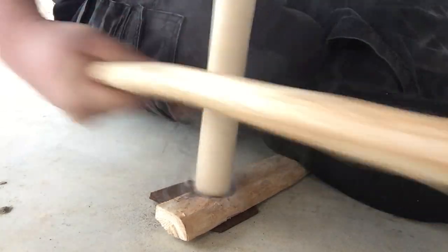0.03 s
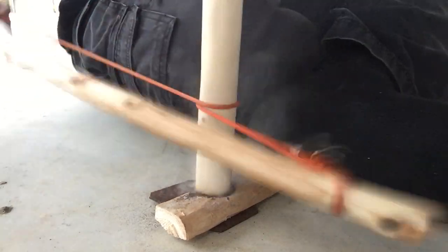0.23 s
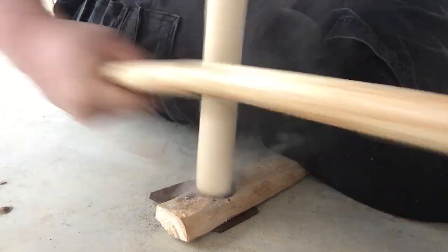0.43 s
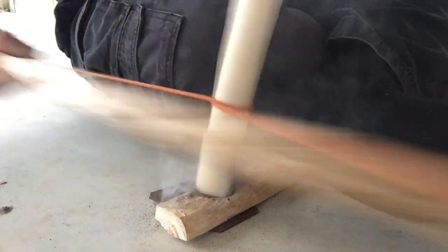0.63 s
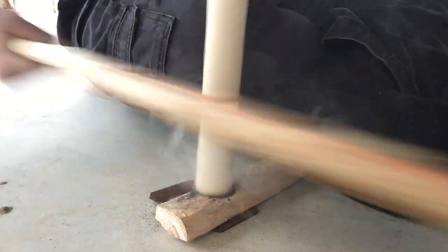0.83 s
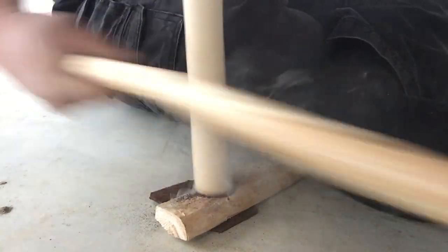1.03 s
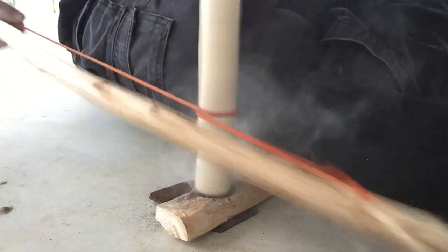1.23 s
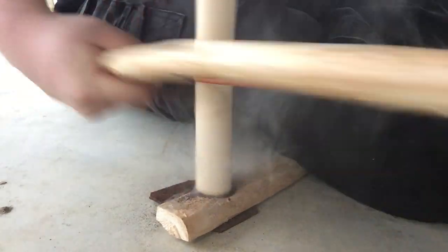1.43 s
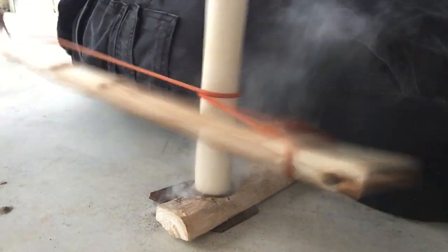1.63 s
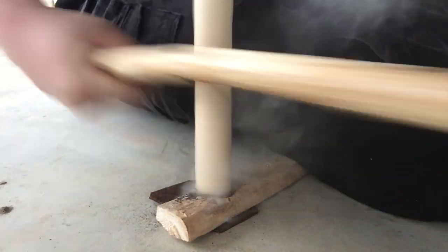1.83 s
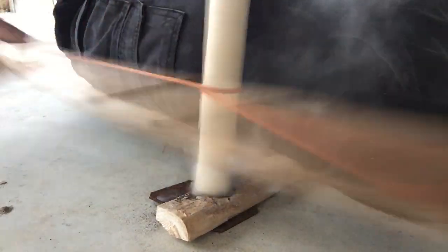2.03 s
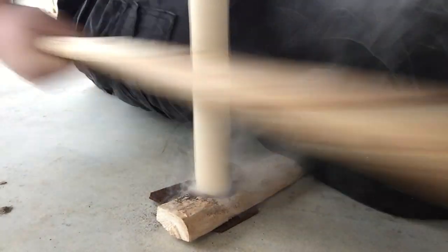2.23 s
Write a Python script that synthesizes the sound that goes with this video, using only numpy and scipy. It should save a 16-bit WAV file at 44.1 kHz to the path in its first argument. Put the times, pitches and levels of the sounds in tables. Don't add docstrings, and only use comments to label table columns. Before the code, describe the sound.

Bow drill rasping quickly back and forth on wood, with brief dry squeaks and ticking turns

```python
import sys
import numpy as np
from scipy import signal
from scipy.fft import rfft, irfft, next_fast_len
from scipy.io import wavfile
from scipy.ndimage import uniform_filter1d, map_coordinates

SR = 44100
rng = np.random.default_rng(int(sys.argv[2]) if len(sys.argv) > 2 else 0)


def transcribe(u):
    v = np.clip(np.atleast_2d(u).T, -1, 1)
    q = np.round(v * 32767).astype(np.int16)
    wavfile.write(sys.argv[1], SR, q)


def volts_from_decibels(level):
    exponent = np.asarray(level, float) / 20
    return 10 ** exponent


N = 101429
TOP_HZ = 15850

# frequency in Hz, density in dB per Hz.
RUMBLE_SPECTRUM = [(24, -8), (40, 0), (70, 4.5), (140, -6), (237, 0), (477, -8.5), (1000, -3.5),
                   (1300, -11.5), (2200, -120)]
# start in seconds, end in seconds, then rasp, low mode and high mode levels in dB.
STROKES = [(-.1, 0.121, -51.5, -62, -44.5), (0.128, 0.366, -51.5, -50, -52),
           (0.384, 0.607, -51, -61.5, -48.5), (0.622, 0.852, -50, -65, -52.5),
           (0.86, 1.118, -51, -55.5, -49.5), (1.108, 1.323, -54, -67, -65), (1.342, 1.559, -49.5, -54, -49),
           (1.536, 1.782, -53.5, -55.5, -52.5), (1.773, 2.025, -52.5, -51.5, -56.5),
           (2.01, 2.256, -52.5, -55.5, -59.5), (2.24, 2.444, -53, -57, -48.5)]
NOTCH_DB = [-64.5, -59, -64.5, -62, -62, -65.5, -64, -61, -65.5, -66, -55.5]
# frequency in Hz, density in dB per Hz.
RASP_SPECTRUM = [(290, -9), (500, -11), (687, -17), (1450, -1.5), (2110, -6.5), (2660, -1.5), (3400, -6.5),
                 (7860, -9.5), (15700, -7.5)]
# frequency in Hz, width in Hz, level in dB.
BOARD_MODES = [(7800, 710, 6.5), (9310, 980, 4.5), (11470, 600, 1)]
# time in seconds, peak in dB, ring length share, pitch share.
TICKS = [
    (0.0034, -35, 0.84, .78),
    (0.3908, -38, 0.67, 0.92),
    (0.623, -34.5, 1.16, 1.03),
    (1.085, -45, 1.3, 0.975),
    (1.1078, -36.5, 1.02, 1.002),
    (1.3374, -36.5, 0.86, .98),
    (1.7961, -30, 0.56, 0.98),
    (1.9985, -49, 0.72, 0.96),
    (2.0186, -30.5, 1.05, 0.98),
    (2.249, -31.5, 0.7, 0.99),
]
# frequency in Hz, level in dB, 60 dB decay in seconds.
SOCKET_MODES = [(2006, 3.5, 0.016), (1553, -2.5, 0.017), (2740, -35, 0.011)]
# centre in seconds, pitch in Hz, level in dB,
# half width in ms, glide in Hz per ms.
LOW_SWELLS = [(.184, 1334, -51.5, 11, -3), (.198, 1250, -49.5, 7.6, -2), (.212, 1257, -47, 10, 0.5),
              (.243, 1208, -33.5, 8.5, -2), (.2575, 1198, -20, 7.87, -7.5), (.273, 1135, -28.5, 5.5, 0.5),
              (.2826, 1144, -24, 4.8, -11), (.298, 1174, -35, 11.2, -3), (.33, 1218, -32.5, 4.8, 2),
              (1.0426, 1371, -43, 5.5, -1), (1.2868, 1308, -51.5, 11.7, 0), (1.4615, 1354, -45.5, 5.6, 1),
              (1.6528, 1108, -35, 5.7, -11), (1.6672, 1079, -22.5, 6.2, -9), (1.685, 1061, -21, 7.3, -10),
              (1.6975, 1130, -21.5, 6.2, 1), (1.714, 1194, -24.5, 5.5, -2.5),
              (1.7265, 1116, -22.5, 7.6, -8), (1.74, 1156, -21, 7.9, 0), (1.752, 1167, -24.5, 5.3, 1.5),
              (1.765, 1246, -39, 7, -2.5), (1.7858, 1158, -46.5, 5.7, 2.5), (1.826, 1135, -48, 8.6, 0),
              (1.85, 1131, -52.5, 9.5, 0.5), (2.137, 1159, -39, 9.9, -6), (2.15, 1249, -34, 5.8, 2),
              (2.1655, 1311, -33, 7.3, 1.5)]
# centre in seconds, pitch in Hz, level in dB,
# half width in ms.
LOW_TAILS = [(.148, 1230, -52.5, 7.3), (.345, 1222, -45, 5.2), (.368, 1170, -52.5, 8.7),
             (.4, 1203, -57, 12.7), (0.431, 1167, -60.5, 14.14), (2.09, 1300, -56.5, 14),
             (2.115, 1282, -46, 5.5)]
# centre in seconds, pitch in Hz, level in dB, half width in ms, glide in Hz per ms.
HIGH_SWELLS = [(.059, 2576, -54, 16.2, -1), (.1038, 2540, -52, 4.83, -0.5), (.4606, 2556, -31, 7.33, 1),
               (.4985, 2596, -29, 4.4, 4.5), (.5081, 2620, -28, 6.7, 0), (.522, 2563, -41, 2.8, 0.5),
               (.534, 2587, -16.5, 5.62, 13.5), (.5435, 2600, -19.5, 5.4, -5), (.554, 2600, -34, 5.8, -3),
               (.5716, 2590, -36.5, 4.2, 1), (.586, 2524, -29, 7.9, -4), (.61, 2614, -47, 11.2, -0.5),
               (.635, 2604, -44.5, 11.2, 1.5), (.9336, 2554, -40.5, 7.1, 0.5), (.947, 2615, -43, 4.4, -0.5),
               (1.0138, 2560, -44.5, 3.3, 1.5)]
# time in seconds, second partial in dB relative to the first.
LOW_BITE = [
    [(.2425, -23), (.2525, -11.5), (.2645, -5.5), (.2775, -16), (.2875, 2.5), (.2975, -9), (.305, -6.5),
     (.328, -10.5), (.34, -8.5)],
    [(1.04, -16), (1.46, -16)],
    [(1.652, -16), (1.671, -4), (1.6875, -16), (1.7025, -5), (1.7125, -13.5), (1.721, 1), (1.7325, -8),
     (1.7425, -13), (1.7525, -29)],
    [(1.77, -6), (2.137, -17.5), (2.165, -15.5)],
]
# time in seconds, second partial in dB relative to the first.
HIGH_BITE = [
    [(.46, -36), (.5, -33.5), (.532, -32.5), (.543, -21.5), (.55, -34), (.572, -25), (.587, -20.5),
     (.6, -32)],
]
# multiple, level in dB at the reference level,
# extra dB per dB of squeak, share of the bite.
LOW_OVERTONES = [(3, -35, .95, .2), (4, -35, .85, .2)]
# multiple, level in dB at the reference level,
# extra dB per dB of squeak, share of the bite.
HIGH_OVERTONES = [(2.98, -10.5, 0.13, 0.74)]
# time in seconds, slip rate in Hz, level in dB.
CREAKS = [
    [(.145, 3050, -53), (.149, 4000, -48), (.152, 4330, -48)],
    [(1.328, 2460, -61), (1.335, 2416, -47), (1.343, 2300, -71)],
    [(1.51, 6000, -47), (1.521, 4260, -48), (1.527, 3100, -60), (1.538, 2450, -46)],
    [(1.553, 1700, -52), (1.558, 3300, -50), (1.564, 3450, -41.5), (1.574, 4120, -36), (1.5765, 5600, -47),
     (1.584, 6300, -34.5), (1.591, 6900, -46)],
    [(1.763, 5360, -49), (1.768, 5150, -52), (1.775, 4200, -56)],
    [(1.975, 7800, -49), (1.987, 4600, -49), (1.995, 3200, -57), (2.001, 1800, -53)],
    [(2.022, 2100, -56), (2.037, 5000, -50), (2.044, 6050, -53), (2.053, 6300, -35.5), (2.0555, 7400, -42),
     (2.06, 8600, -38.5), (2.064, 8900, -53)],
    [(2.22, 5200, -64), (2.224, 3630, -57), (2.229, 2330, -55)],
]
CREAK_TILTS_DB = [-23, -1, -5.5, -6.5, -4, -0.5, -4.5, -14]
# start in seconds, length in seconds, level in dB.
SCUFFS = [
    (0.622, 0.011, -56),
    (1.084, 0.0099, -45.5),
    (1.102, 0.0018, -49),
    (1.327, 0.023, -52.5),
    (1.54, 0.017, -43),
    (1.788, 0.0049, -38),
    (1.991, 0.018, -44.5),
    (2.012, 0.02, -43),
    (2.227, 0.028, -44.5),
]
# frequency in Hz, density in dB per Hz.
SCUFF_SPECTRUM = [(530, -25), (900, -13.5), (1740, 0.5), (5960, -9), (6710, -7.5), (15700, -6.5)]
# time in seconds,
# peak in dB, frequency in Hz.
SNAPS = [
    (0.752, -49, 8000),
    (0.932, -42, 7680),
    (0.9951, -44, 8900),
    (1.047, -40.5, 7760),
    (1.3763, -45, 9170),
    (1.4304, -38.5, 7820),
    (1.9308, -41, 7900),
    (1.9405, -37, 9300),
    (1.9484, -39, 7790),
    (1.9705, -37.5, 8870),
         (0.7895, -41, 4110),
    (1.7628, -47, 4140),
    (1.8134, -52, 5550),
]
# time in seconds, peak in dB, frequency in Hz.
THUDS = [
    (0.767, -53, 301),
    (1.263, -54, 376),
    (1.448, -56.5, 214),
    (2.085, -58.5, 284),
]


def unit(x):
    return x / np.sqrt(np.mean(x ** 2) + 1e-20)


def along(points, hz):
    f, v = np.transpose(points)
    return np.interp(np.log(hz + 1), np.log(f + 1), v)


def wobble(rate, size=N):
    knots = rng.standard_normal(int(size * rate / SR) + 4)
    return map_coordinates(knots, [np.arange(size) * rate / SR])


def filtered(x, response):
    m = next_fast_len(N + 8192)
    return irfft(rfft(x, m) * response(np.fft.rfftfreq(m, 1 / SR)), m)[:N]


def coloured(x, spectrum):
    return unit(filtered(x, lambda f: volts_from_decibels(along(spectrum, f))))


def mode(f, hz, width_hz):
    return 1j * f * width_hz / (hz * hz - f * f + 1j * f * width_hz)


def add(out, s, x):
    part = out[round(s * SR):][:len(x)]
    part += x[:len(part)]


def air():
    rumble = coloured(rng.standard_normal(N), RUMBLE_SPECTRUM)
    hiss = coloured(rng.standard_normal(N), [(700, -32), (1000, 13), (4000, 2.5), (15000, -12.5)])
    return volts_from_decibels(-69 + 1.1 * wobble(6.84)) * rumble + volts_from_decibels(-69.5) * hiss


def patchy(x, depth_db):
    z = signal.stft(x, nperseg=256)[2]
    field = uniform_filter1d(rng.standard_normal(z.shape), size=4, axis=0)
    field = uniform_filter1d(field, size=5, axis=1)
    return signal.istft(z * volts_from_decibels(depth_db * unit(field)), nperseg=256)[1][:N]


def grit(depth_db):
    return rng.standard_normal(N) * volts_from_decibels(depth_db * rng.standard_normal(N))


def grit_on_mode(depth_db, hz, width_hz):
    return unit(filtered(grit(depth_db), lambda f: mode(f, hz, width_hz) ** 2))


def board(f):
    peaks = sum(volts_from_decibels(db) * abs(mode(f, hz, width)) ** 2 for hz, width, db in BOARD_MODES)
    return volts_from_decibels(along(RASP_SPECTRUM, f)) * (1 + peaks)


def rasp():
    t = np.arange(N) / SR
    gains = np.zeros((4, N))
    speed_powers = np.array([[1.12], [0.82], [0.82], [1.12]])
    for (start, end, *dbs), notch_db in zip(STROKES, NOTCH_DB):
        rise_s, fall_s = 0.088 if start < 1 else 0.054, 0.06
        speed = np.clip((t - start) / rise_s, 0, 1) * np.clip((end - t) / fall_s, 0, 1)
        gains += volts_from_decibels(np.array([*dbs, notch_db]))[:, None] * speed ** speed_powers
    body = unit(patchy(filtered(grit(3), board), depth_db=2))
    body = body * volts_from_decibels(.8 * wobble(40) + 2.2 * wobble(300))
    low = grit_on_mode(0.42, hz=1286, width_hz=230) * volts_from_decibels(3 * unit(wobble(90)) - 8.5)
    high = grit_on_mode(1.5, hz=2516, width_hz=190) * volts_from_decibels(3 * unit(wobble(70)) - 8)
    notch = grit_on_mode(1.2, hz=4314, width_hz=590) * volts_from_decibels(2.7 * wobble(110))
    return (gains * [body, low, high, notch]).sum(axis=0)


def ticks():
    out, t = np.zeros(N), np.arange(SR // 8) / SR
    for s, db, share, pitch in TICKS:
        ring = np.zeros(len(t))
        for hz, level, t60 in SOCKET_MODES:
            decay = volts_from_decibels(level + rng.normal(0, 3) - 60 * t / (t60 * share))
            ring += decay * np.sin(2 * np.pi * hz * pitch * t + 0.63 * wobble(430, size=len(t)))
        add(out, s, volts_from_decibels(db + 4.0) * (1 - np.exp(-t / 0.0015)) * ring)
    return out


def stick_slip(pitch, level, overtones, jitter):
    size = len(pitch)
    phase = 2 * np.pi * np.cumsum(pitch) / SR + jitter * wobble(600, size=size)
    x = np.sin(phase)
    for k, relative_db in overtones:
        strength = volts_from_decibels(relative_db + 1.1 * wobble(330, size=size)) * (k * pitch < TOP_HZ)
        x -= strength * np.cos(k * phase + .7)
    return np.sqrt(2) * volts_from_decibels(level) * x


def squeak(swells, bites, table):
    s, hz, db, width, glide = np.transpose(swells)[:, :, None]
    t = np.arange(N) / SR
    ms = (t - s) * 1000
    bells = volts_from_decibels(db) * np.exp(-(ms / width) ** 2) + 1e-9
    swell_pitch = hz + glide * np.clip(ms, -width, width)
    pitch = (bells ** 2 * swell_pitch).sum(axis=0) / (bells ** 2).sum(axis=0)
    level = 20 * np.log10(bells.sum(axis=0))
    bite = np.interp(t, *np.vstack(bites).T)
    overtones = [(2.006, bite)]
    for k, relative_db, slope, share in table:
        overtones.append((k, relative_db + slope * (level + 25.5) + share * bite))
    return stick_slip(pitch, level, overtones, jitter=0.023)


def squeaks():
    low_rows = [*LOW_SWELLS, *[(*row, 0) for row in LOW_TAILS]]
    low = squeak(low_rows, LOW_BITE, LOW_OVERTONES)
    return low + squeak(HIGH_SWELLS, HIGH_BITE, HIGH_OVERTONES)


def creak(rows, tilt_db):
    s, hz, db = np.transpose(rows)
    t = np.arange(s[0], s[-1], 1 / SR)
    level = np.interp(t, s, db) + 3 * wobble(310, size=len(t)) - 2.0
    fade = np.clip(np.minimum(t - t[0], t[-1] - t) / 0.001, 0, 1)
    overtones = [(k, tilt_db * np.log2(k)) for k in range(2, 7)]
    return fade * stick_slip(np.interp(t, s, hz), level, overtones, jitter=.9)


def cord():
    gate = np.zeros(N)
    for s, length, db in SCUFFS:
        add(gate, s, volts_from_decibels(db) * np.sin(np.pi * np.linspace(0, 1, round(length * SR))) ** 0.65)
    slips = grit(3) * volts_from_decibels(2 * wobble(700))
    out = coloured(slips, SCUFF_SPECTRUM) * gate
    for rows, tilt_db in zip(CREAKS, CREAK_TILTS_DB):
        add(out, rows[0][0], creak(rows, tilt_db))
    return out


def snaps():
    out, t = np.zeros(N), np.arange(SR // 40) / SR
    rise_s, t60 = 0.00056, .012
    for s, db, hz in SNAPS:
        ring = np.sin(2 * np.pi * hz * t + .6 * wobble(700, size=len(t)))
        add(out, s, volts_from_decibels(db + 6 - 60 * t / t60) * (1 - np.exp(-t / rise_s)) * ring)
    return out


def bow_knocks():
    out, t = np.zeros(N), np.arange(SR // 8) / SR
    rise_s, t60 = 0.0049, 0.085
    for s, db, hz in THUDS:
        ring = np.sin(2 * np.pi * hz * t + 1.75 * wobble(88, size=len(t)))
        add(out, s, volts_from_decibels(db + 5.0 - 60 * t / t60) * (1 - np.exp(-t / rise_s)) * ring)
    return out


def scene():
    return (air() + rasp() + ticks() + squeaks() + cord() + snaps() + bow_knocks())[None]


def low_pass(x):
    return signal.sosfilt(signal.butter(12, 16950, fs=SR, output="sos"), x)


def record(dry):
    mix = filtered(dry[0], lambda f: (f < TOP_HZ) / (1 + (42 / (f + 1)) ** 4))[None]
    return low_pass(mix)


dry = scene()
out = record(dry)
transcribe(out)
```